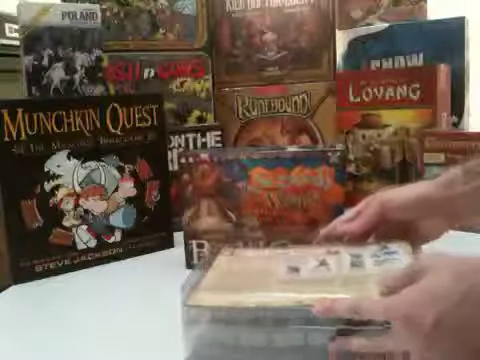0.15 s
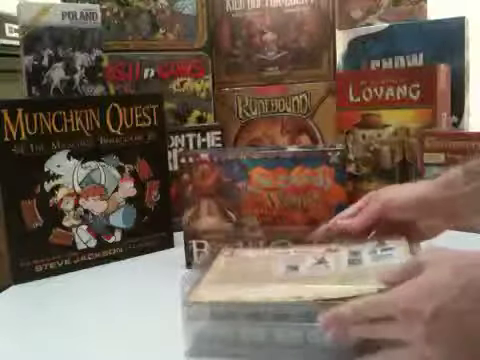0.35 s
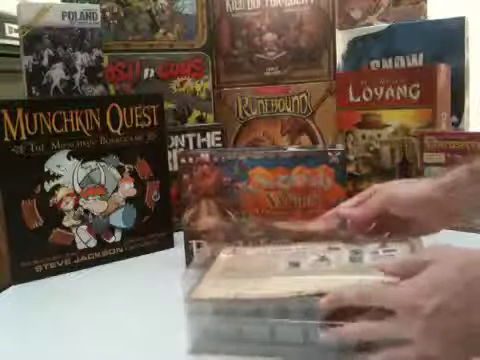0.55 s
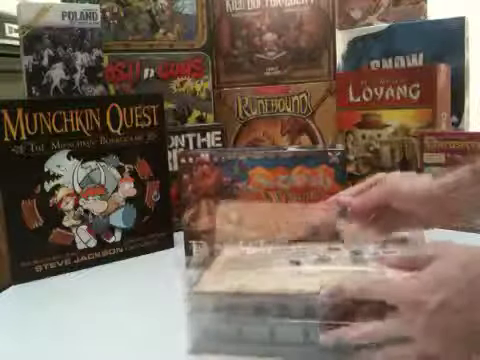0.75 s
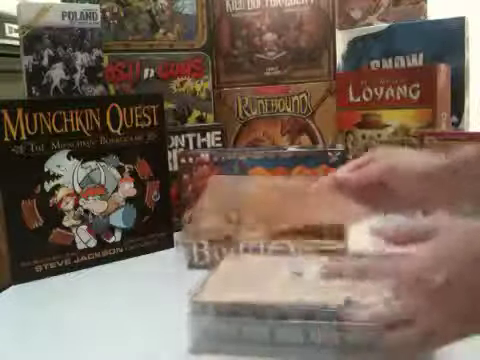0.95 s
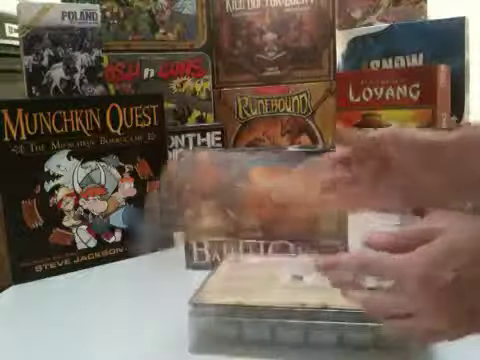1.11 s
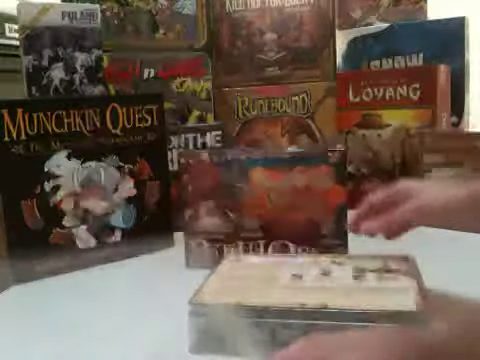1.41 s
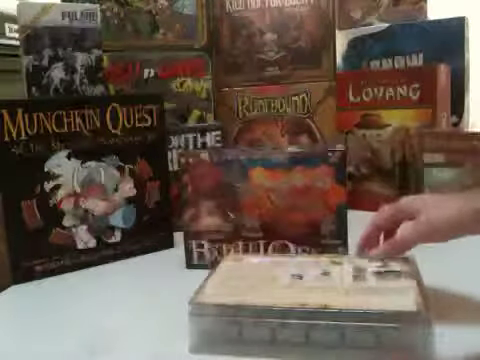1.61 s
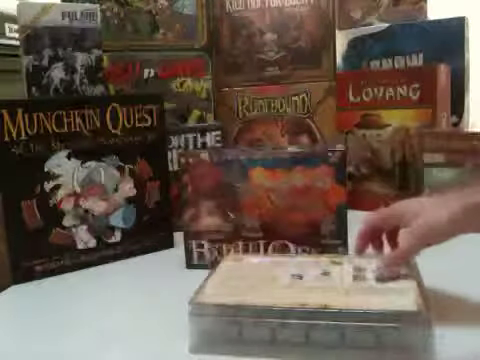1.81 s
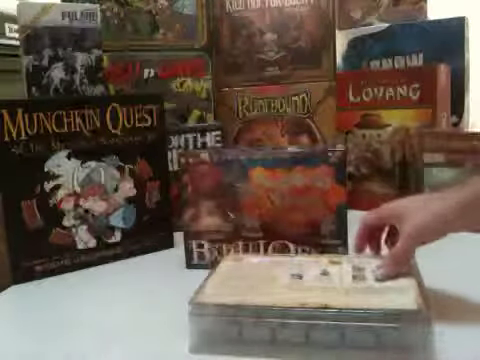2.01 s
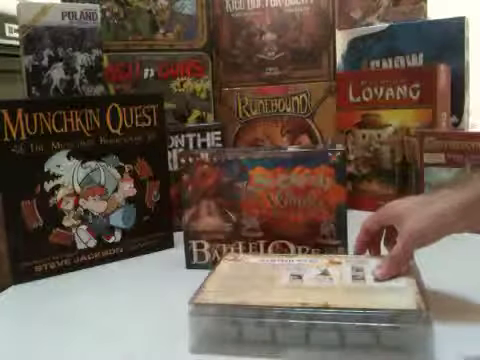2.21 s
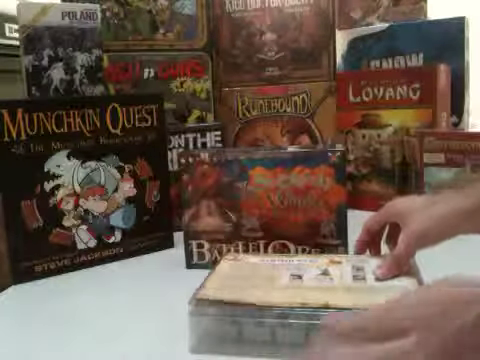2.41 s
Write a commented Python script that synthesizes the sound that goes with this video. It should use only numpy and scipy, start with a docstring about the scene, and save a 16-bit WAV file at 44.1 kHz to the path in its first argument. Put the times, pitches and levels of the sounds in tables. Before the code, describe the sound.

Cardboard box being handled, close, in a small furnished room over steady hiss. Faint rubs, ticks and soft bumps until 0.8 s; crackly scraping and low knocks from 0.85 to 1.15 s, with a tiny high squeak near 0.97. Soft bumps around 1.3, near quiet, light ticks at 1.7. A sharp hollow knock at 1.87, then a louder cluster from 2.04 to 2.25 with paper rustle, fading into ticks by 2.4.

```python
"""Cardboard rubs, rustles and knocks over a steady hiss: hands ease a thin clear lid off a box on a table,
set it aside, then knock the box and lift the paper inside. The lid squeaks once, after a few fainter squeaks.
Knocks and rubbing ring a set of box modes; ticks and rustle are short noises and clicks in the treble;
squeaks are gliding sine waves. A small furnished room adds a dull tail, and the microphone has little bass."""
import sys
import numpy as np
from scipy import signal
from scipy.fft import rfft, irfft, next_fast_len
from scipy.io import wavfile
from scipy.ndimage import uniform_filter1d

SR = 44100
rng = np.random.default_rng(int(sys.argv[2]) if len(sys.argv) > 2 else 0)


def master(y):
    """Save y as 16-bit WAV."""
    cut = np.clip(np.atleast_2d(y).T, -1, 1)
    pcm = np.round(cut * 32767)  # scale
    wavfile.write(sys.argv[1], SR, pcm.astype(np.int16))


def undo_db(level):
    """Turn decibels back into plain size, where 20 dB means ten times bigger."""
    steps = np.asarray(level, float) / 20
    return 10 ** steps


N = 112454  # length of the scene in samples

# The notes at which the box rings: (frequency [Hz], relative level [dB], time to fade by 60 dB [s])
BOX_MODES = [(186, 2, 0.025), (233, -0.5, 0.023), (288.6, -0.5, 0.043), (348, 5, 0.023),
             (406.3, -3.5, 0.048), (461.4, 2.5, 0.026), (510, 0, 0.018), (560, 2.5, 0.024),
             (623.5, 1.5, 0.03), (690, -1.5, 0.023), (752, 0.5, 0.028), (835, -3.5, 0.036),
             (925, 6.5, 0.017), (1152, 4.5, 0.015), (1363, -7.5, 0.016), (1457, -6.5, 0.017),
             (1578, -12.5, 0.013), (1813, -9, 0.015), (2060, -14.5, 0.011), (2430, -18.5, 0.013),
             (2880, -21.5, 0.014), (3400, -16, 0.0039), (3960, -37, 0.0055)]


def curve(rows, column):
    """Joins one table column by straight lines in time."""
    rows = np.array(rows, float)
    return np.interp(np.arange(N) / SR, rows[:, 0], rows[:, column])


def unit(x):
    """Scales a signal to an rms of 1."""
    return x / np.sqrt(np.mean(x ** 2))


def band(x, hz, width_hz):
    """Keeps only a band of frequencies around hz."""
    edges = [hz - width_hz / 2, hz + width_hz / 2]
    return signal.sosfilt(signal.butter(2, edges, "band", fs=SR, output="sos"), x)


def mode(x, hz, t60):
    """One note of a body struck by x, fading by 60 dB in t60 seconds."""
    radius = np.exp(-np.log(1000) / (t60 * SR))
    angle = 2 * np.pi * hz / SR
    return signal.lfilter([0, np.sin(angle)], [1, -2 * radius * np.cos(angle), radius ** 2], x)


def grains(per_s, spread_db):
    """Scatters clicks at random, most small and a few larger, to an rms of 1."""
    hit = rng.random(N) < per_s / SR
    sign = rng.choice([-1, 1], N)
    size_db = spread_db * np.minimum(rng.exponential(size=N), 3.5)
    return unit(hit * sign * undo_db(size_db))


def add(out, at_s, x):
    """Mixes x into out at a given time."""
    start = int(at_s * SR)
    out[start:start + len(x)] += x[:N - start]


def crisp(bright, middle):
    """Colours small releases with a bright band and a middle band."""
    return band(bright, 13230, 8630) + band(middle, 3500, 3800)  # centre and width in Hz


def rub():
    """Fingers slip and catch on the board; every catch rings the box, most near the pitch of the grip."""
    # Hand pressure on the box, heard as loudness: (time [s], level [dB])
    pressure = [(0, -62.5), (.13, -60), (.16, -63), (.3, -65.5), (.5, -66), (.56, -60.5), (.66, -70),
                (.84, -64.5), (.875, -45), (.945, -59.5), (.96, -53), (1.02, -61), (1.05, -55),
                (1.09, -56.5), (1.11, -68), (1.16, -56), (1.2, -78), (1.28, -59.5), (1.3, -83), (1.36, -86),
                (1.41, -70), (1.55, -78), (1.86, -83), (1.9, -57), (2.02, -57), (2.06, -42.5), (2.09, -58),
                (2.13, -41), (2.2, -48), (2.215, -48.5), (2.27, -54.5), (2.38, -63), (2.42, -65.5),
                (2.55, -83)]
    # Where the gripped board rings best: (time [s], frequency [Hz])
    grip = [(0, 420), (.5, 393), (.8, 495), (.9, 455), (1.1, 410), (1.4, 382), (1.8, 457), (1.9, 600),
            (2.1, 510), (2.3, 540), (2.55, 503)]
    catches_per_s, spread_db = 500, 4
    grip_octaves, lowest_lean_db = 0.91, -2.5
    centre_hz = curve(grip, 1)
    ring = np.zeros(N)
    for hz, db, t60 in BOX_MODES:
        octaves_away = np.log2(hz / centre_hz)
        # notes far from the grip are weaker, down to a floor
        lean_db = np.maximum(-6 * (octaves_away / grip_octaves) ** 2, lowest_lean_db)
        ring += undo_db(db + lean_db) * mode(grains(catches_per_s, spread_db), hz, t60)
    return unit(ring) * undo_db(curve(pressure, 1))


def rustle():
    """Lid and paper crinkle in dense clicks, coloured by a bright and a middle band."""
    # How loud the rustle is: (time [s], level [dB])
    loudness = [(0, -65), (.15, -61), (.25, -67), (.5, -68.5), (.53, -58), (.6, -67.5), (.81, -68.5),
                (.83, -56.5), (.855, -58.5), (.862, -50.5), (.88, -50.5), (.92, -50.5), (.935, -55.5),
                (1.04, -54.5), (1.08, -59), (1.15, -69.5), (1.86, -102), (1.88, -63), (1.92, -78),
                (2.03, -69), (2.045, -53.5), (2.2, -55.5), (2.25, -59.5), (2.35, -81), (2.55, -84)]
    crinkles_per_s, spread_db, middle_db = 4000, 4.5, -1.5
    bright = grains(crinkles_per_s, spread_db)
    middle = undo_db(middle_db) * grains(crinkles_per_s, spread_db)
    return unit(crisp(bright, middle)) * undo_db(curve(loudness, 1))


def hiss():
    """Room air and microphone noise: random noise shaped in frequency."""
    # Colour of the hiss: (frequency [Hz], relative level per Hz [dB])
    colour = [(20, -11), (65, -23), (115, -12.5), (200, -2), (350, -1.5), (700, -5.5), (1500, -9),
              (3000, -12.5), (6000, -15.5), (11000, -13), (16000, -14.5)]
    level_db = -61.5  # rms
    colour_hz, colour_db = np.array(colour).T
    n = next_fast_len(N)
    # interpolate along a logarithmic frequency scale
    db = np.interp(np.log(np.fft.rfftfreq(n, 1 / SR) + 1), np.log(colour_hz), colour_db)
    noise = irfft(rfft(rng.standard_normal(n)) * undo_db(db), n)[:N]
    return unit(noise) * undo_db(level_db)


def ticks():
    """Skin and paper let go in noise bursts that quickly rise and die, with a faint short tail."""
    # Each tick: (time [s], level before colouring [dB], middle band against bright band [dB], rise time [s])
    releases = [(0.037, -52, -19, 0.0016), (0.078, -45.5, -14, 0.00049), (0.11, -50, -10, 0.00022),
                (0.139, -47.5, -4.5, 0.002), (0.194, -54, -5, 0.0024), (0.283, -52.5, -3.5, 0.0022),
                (0.431, -54.5, 1.5, 0.0012), (.509, -49, 2, 0.0044), (0.536, -55, -14, .0006),
                (0.568, -50.5, -5.5, 0.001), (0.616, -51.5, -3, 0.00077), (0.698, -51, -6.5, 0.00092),
                (0.717, -50, -12, 0.0004), (0.862, -53, -16, 0.0014), (0.866, -46, -7, 0.0011),
                (0.873, -43, -5, 0.0025), (0.902, -44, -19, 0.0035), (0.917, -45.5, -3, 0.002),
                (0.969, -47, -14, 0.0017), (1.03, -45.5, -3, 0.0021), (1.05, -49, -8, 0.0018),
                (1.548, -57.5, 5, 0.002), (1.705, -47.5, -11, 0.00039), (1.7106, -44.5, -0.5, 0.00017),
                (1.717, -41.5, -33, 0.00036), (1.7656, -44.5, -10.5, 0.0005), (1.7955, -46, -9, 0.00036),
                (1.799, -52, -2, 0.00039), (1.8012, -47, -9, 0.00044), (1.8047, -56, -10, 0.00033),
                (1.809, -59, -18, .0003), (1.871, -49.5, 8, 0.0021), (1.887, -58, -18, .0006),
                (1.9738, -38.5, -9, 0.0013), (2.01, -35.5, -15, 0.00086), (2.037, -44.5, 5.5, 0.0013),
                (2.116, -48, 5, 0.002), (2.1554, -40.5, -18, 0.0003), (2.1575, -48, -3, 0.00035),
                (2.191, -47.5, -1.5, 0.0034), (2.227, -44.5, -1.5, 0.0007), (2.2334, -41.5, -14, 0.0016),
                (2.268, -37.5, -4.5, 0.00034), (2.299, -53, -2, 0.0007), (2.308, -50, -4, 0.00066),
                (2.3388, -38.5, -6, 0.00044), (2.4235, -42, -7, 0.00095)]
    tail_s, tail_db = 0.012, -14.5
    bright, middle = np.zeros(N), np.zeros(N)
    t = np.arange(SR // 30) / SR
    for at_s, db, middle_db, rise_s in releases:
        burst = np.e * t / rise_s * np.exp(-t / rise_s)
        shape = burst + undo_db(tail_db) * np.exp(-t / tail_s)
        add(bright, at_s, shape * undo_db(db))
        add(middle, at_s, shape * undo_db(db + middle_db))
    return crisp(bright * rng.standard_normal(N), middle * rng.standard_normal(N))


def knocks():
    """A gritty push builds up the box modes near its centre; longer contacts scatter their phases more."""
    # Each knock: (time [s], peak level [dB], centre of the ring [Hz], level of upper modes [dB], contact time [s])
    hits = [(.138, -39.5, 495, -0.5, 0.0051), (.144, -43, 700, -9, 0.0057), (.375, -42, 400, -5, .007),
            (.535, -49.5, 347, -7, 0.0084), (0.549, -53.5, 496, 11, 0.013),
            (0.677, -46.5, 300, -23, 0.0021), (.768, -48, 715, -25, 0.0076),
            (.777, -49.5, 744, -25, 0.0078), (.854, -42, 484, -4, 0.0048), (.869, -37.5, 447, 1, 0.005),
            (.878, -34.5, 473, 0.5, 0.0028), (0.892, -38, 430, -19, 0.0024), (.922, -37, 422, -8, 0.004),
            (.937, -44.5, 406, -14, .006), (1.0255, -37, 554, -2.5, 0.0043), (1.031, -37, 486, -8, 0.0048),
            (1.04, -38.5, 407, -30, 0.0014), (1.07, -40, 387, -15, 0.006), (1.086, -43, 403, -9, 0.0034),
            (1.128, -43, 398, -23, 0.0068), (1.155, -43.5, 296, -15, 0.012), (1.177, -50, 325, -18, 0.011),
            (1.241, -44.5, 422, -17, 0.0079), (1.284, -42, 383, -44, 0.011),
            (1.2925, -36.5, 590, -32, 0.0055), (1.301, -41, 410, -30, 0.0073),
            (1.309, -47, 600, -34, 0.0045), (1.327, -44.5, 390, -36, 0.0076),
            (1.343, -44, 305, -34, 0.0062), (1.8708, -17, 715, 3.5, 0.0007), (1.8766, -26, 596, 3, 0.0011),
            (1.883, -41, 560, 3, 0.0027), (1.938, -35, 620, 2, 0.0024), (2.0365, -26, 524, 7, 0.0021),
            (2.045, -25.5, 510, 1, 0.0036), (2.062, -43, 530, 9, 0.0091), (2.083, -37, 510, -6, 0.0055),
            (2.0955, -18.5, 560, -2, 0.0017), (2.1019, -31, 560, 9, 0.0011),
            (2.1159, -23.5, 606, 12.5, 0.003), (2.121, -29.5, 560, 12, 0.0033),
            (2.129, -30.5, 453, -5, 0.0038), (2.139, -29.5, 505, -6, 0.008), (2.153, -31, 433, -10, 0.0042),
            (2.163, -31.5, 510, -18, 0.0041), (2.179, -32.5, 537, 0, 0.0091),
            (2.203, -39.5, 500, 2, 0.0043), (2.234, -32.5, 467, 2, 0.0023)]
    ring_octaves, upper_hz, scatter_db = 0.42, 1250, 1.5
    detune = 0.017  # typical random pitch error, as a share of the frequency
    grit, grit_s = 0.74, 0.00026  # strength and smoothing time of the roughness
    out, t = np.zeros(N), np.arange(SR // 8) / SR
    hz, db, t60 = np.array(BOX_MODES).T[:, :, None]
    decay = np.exp(-np.log(1000) * t / t60)
    for at_s, peak_db, centre_hz, upper_db, contact_s in hits:
        pitch_luck, level_luck, phase_luck = rng.standard_normal((3, len(BOX_MODES), 1))
        noise = rng.standard_normal((len(BOX_MODES), SR // 20))
        near_db = -6 * (np.log2(hz / centre_hz) / ring_octaves) ** 2
        lean_db = np.where(hz > upper_hz, upper_db, near_db)
        part = t[:noise.shape[1]] / contact_s
        roughness = 1 + grit * unit(uniform_filter1d(noise, int(grit_s * SR) + 1))
        push = roughness * part * np.exp(-4 * part)
        # the push feeds each mode while the mode fades
        swell = signal.fftconvolve(decay, push, axes=1)[:, :len(t)]
        phase = 2 * np.pi * hz * (1 + detune * pitch_luck) * t + hz * contact_s * phase_luck
        level = undo_db(db + lean_db + scatter_db * level_luck)
        ring = np.sum(level * swell * np.sin(phase), axis=0)
        add(out, at_s, ring / np.abs(ring).max() * undo_db(peak_db))
    return out


def chirps():
    """Tiny squeaks as the lid is eased: short sine waves that glide and waver in pitch."""
    # Each faint squeak: (time [s], length [s], start pitch [Hz], end pitch [Hz], level [dB])
    glides = [(0.454, 0.02, 762, 770, -63.5), (0.668, 0.018, 2080, 2040, -65.5),
              (0.788, 0.016, 1910, 2300, -63)]
    out = np.zeros(N)
    for at_s, length_s, from_hz, to_hz, db in glides:
        n = int(length_s * SR)
        waver = 1 + 0.039 * unit(uniform_filter1d(rng.standard_normal(n), size=60))
        hz = np.linspace(from_hz, to_hz, n) * waver
        tone = np.sin(2 * np.pi * np.cumsum(hz) / SR)
        add(out, at_s, 2 * undo_db(db) * np.hanning(n) * tone)
    return out


def squeak():
    """The lid slides off with a brief whistle of friction: a sine wave of wavering pitch."""
    # Path of the whistle: (time [s], pitch [Hz], rms level [dB])
    path = [(.965, 2975, -75), (.97, 3100, -48), (.974, 3200, -60), (.9775, 3190, -44), (.982, 3650, -55.5),
            (.992, 3630, -54.5), (1.007, 3640, -63), (1.018, 3500, -80)]
    waver = 1 + 0.0082 * unit(uniform_filter1d(rng.standard_normal(N), size=60))
    hz = curve(path, 1) * waver
    t = np.arange(N) / SR
    sounding = (t > path[0][0]) * (t < path[-1][0])
    tone = np.sqrt(2) * np.sin(2 * np.pi * np.cumsum(hz) / SR)
    return undo_db(curve(path, 2)) * tone * sounding


def room(x):
    """Adds a dull, diffuse tail of fading noise that starts after a short gap."""
    t60_s, tail_db, top_hz, gap_s = 0.37, -15, 1930, 0.0044
    t = np.arange(SR // 2) / SR
    tail = rng.standard_normal(len(t)) * np.exp(-np.log(1000) * t / t60_s) * (t > gap_s)
    tail = signal.lfilter(*signal.butter(2, top_hz, fs=SR), tail)
    tail = tail / np.sqrt(np.sum(tail ** 2))
    return x + undo_db(tail_db) * signal.fftconvolve(x, tail)[:N]


def scene():
    """Table sounds travel to the microphone through the room, lose bass and gain hiss."""
    distance_m, bass_cut_hz = 0.55, 266
    table = knocks() + rub() + ticks() + rustle() + squeak() + chirps()
    lag = int(distance_m / 343 * SR)  # every table sound starts about 1.6 ms later
    arriving = np.pad(table, (lag, 0), mode="reflect")[:N]
    bass_cut = signal.butter(3, bass_cut_hz, "high", fs=SR, output="sos")
    heard = signal.sosfilt(bass_cut, room(arriving))
    return (heard + hiss())[None]  # one channel


def low_pass(x):
    """Removes everything above the highest recorded frequency."""
    return signal.sosfilt(signal.butter(12, 16670, fs=SR, output="sos"), x)


def record(dry):
    """The recorder cuts the top of the treble with a steep low-pass."""
    top_cut = signal.ellip(8, 0.3, 30, 15500, fs=SR, output="sos")  # ripple dB, stop dB, Hz
    mix = signal.sosfilt(top_cut, dry)
    return low_pass(mix)


dry = scene()
out = record(dry)
master(out)
```